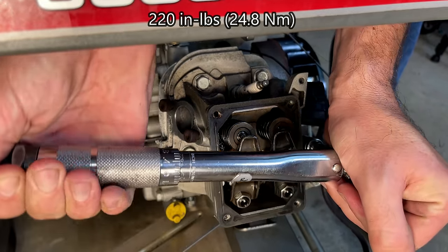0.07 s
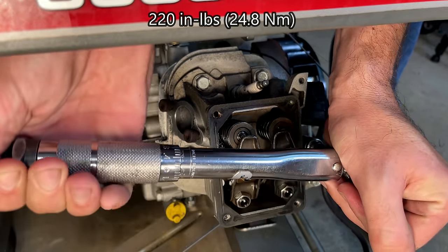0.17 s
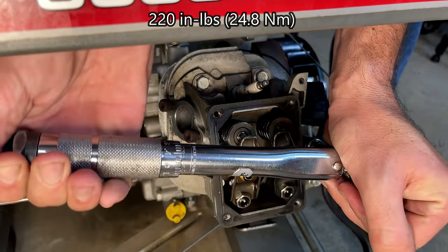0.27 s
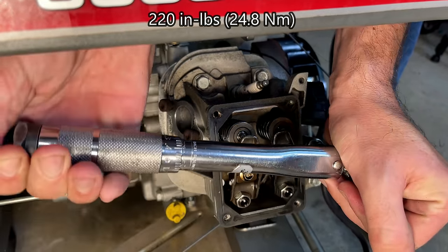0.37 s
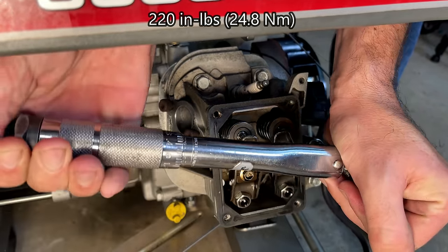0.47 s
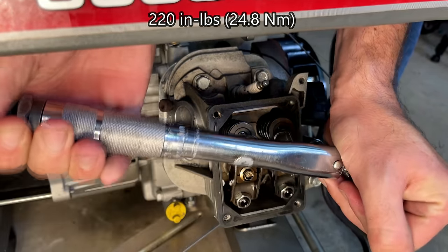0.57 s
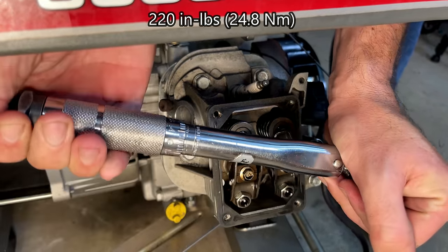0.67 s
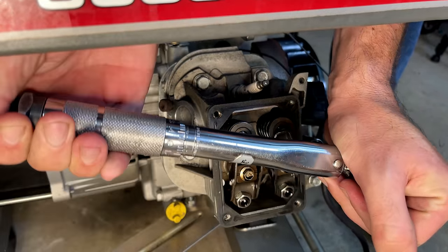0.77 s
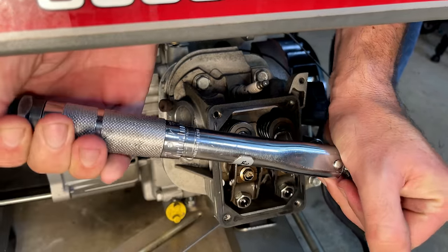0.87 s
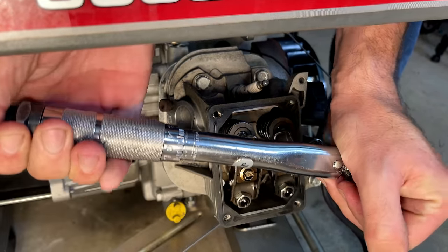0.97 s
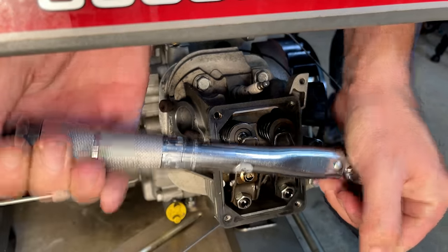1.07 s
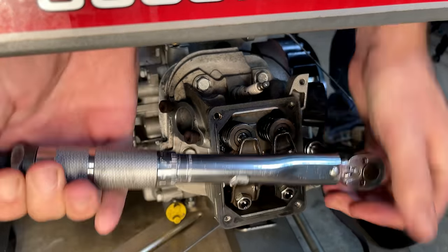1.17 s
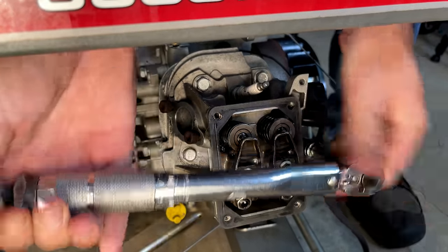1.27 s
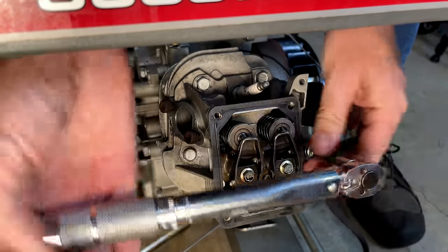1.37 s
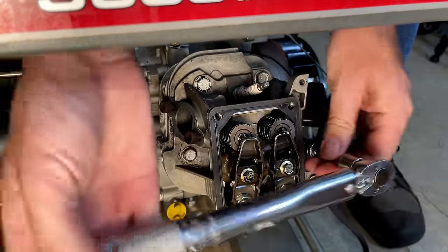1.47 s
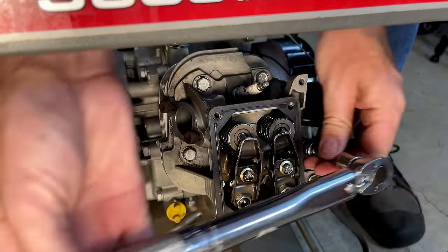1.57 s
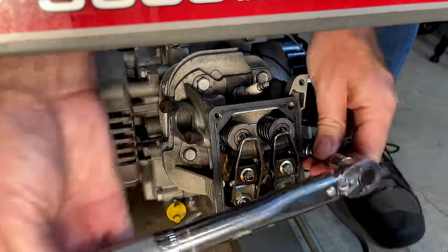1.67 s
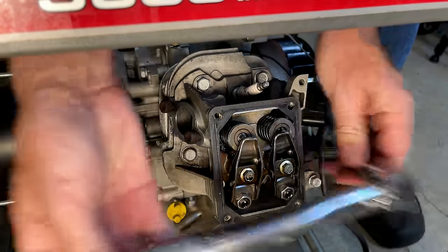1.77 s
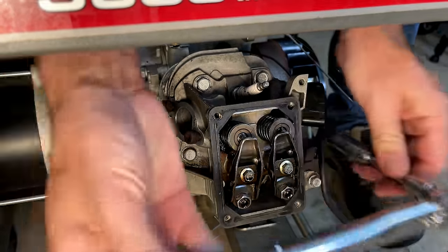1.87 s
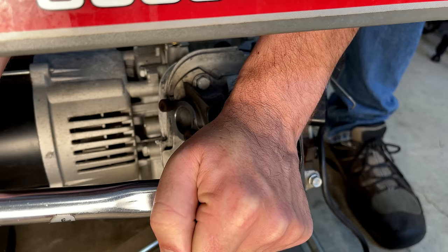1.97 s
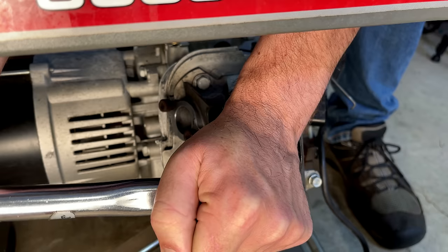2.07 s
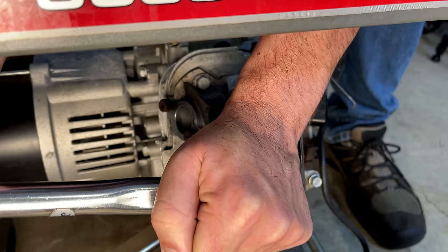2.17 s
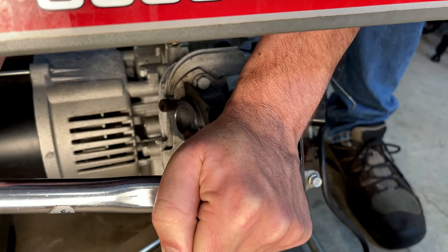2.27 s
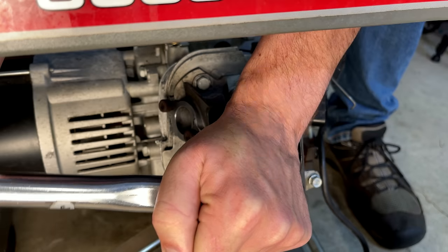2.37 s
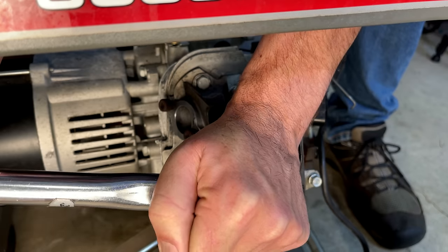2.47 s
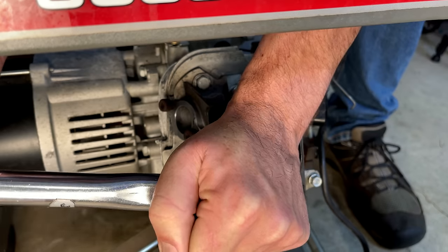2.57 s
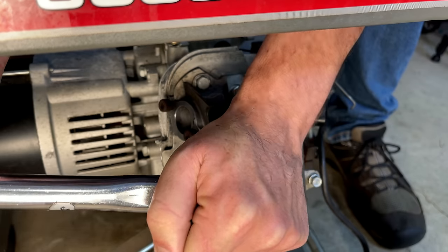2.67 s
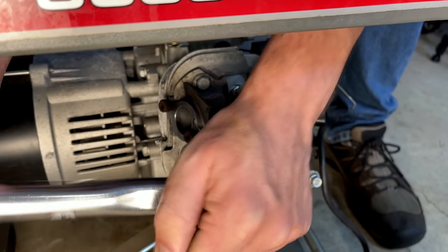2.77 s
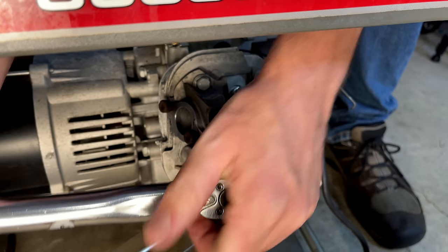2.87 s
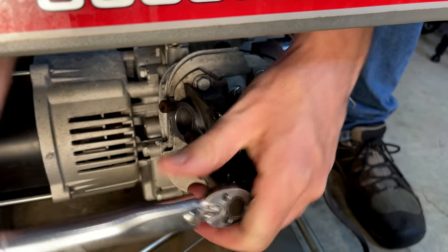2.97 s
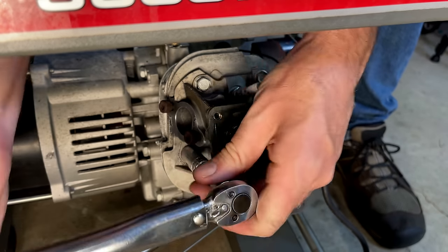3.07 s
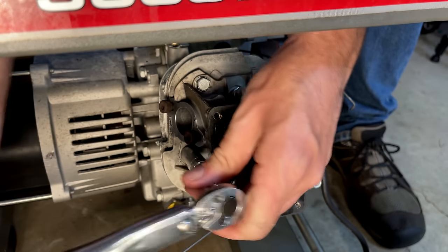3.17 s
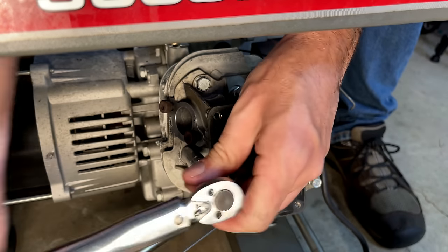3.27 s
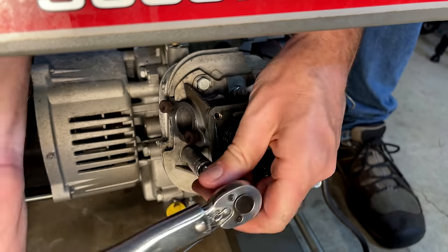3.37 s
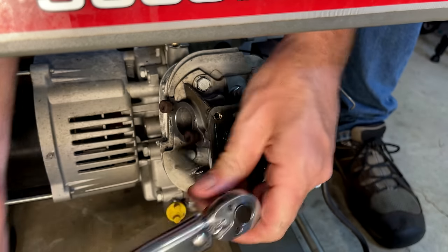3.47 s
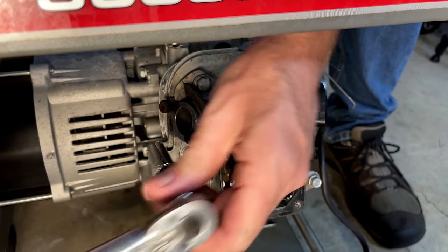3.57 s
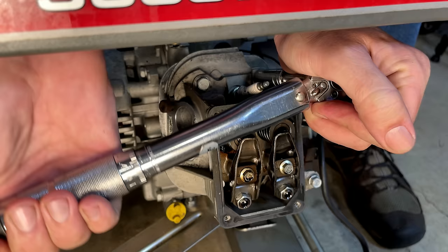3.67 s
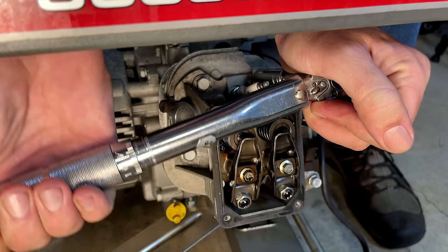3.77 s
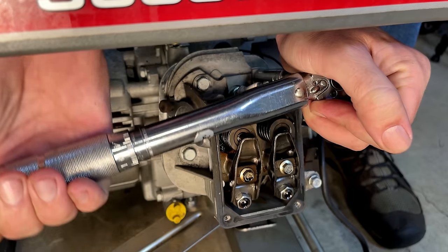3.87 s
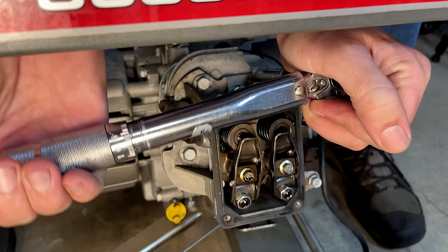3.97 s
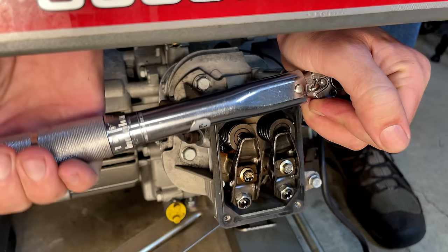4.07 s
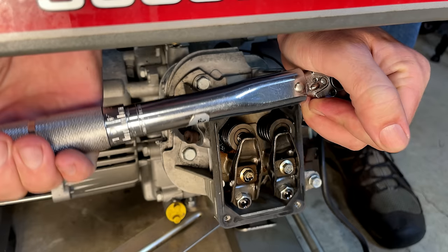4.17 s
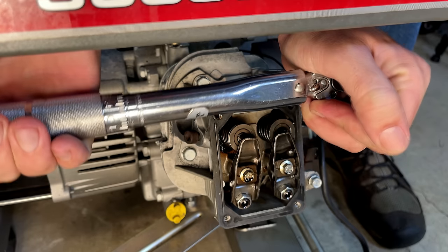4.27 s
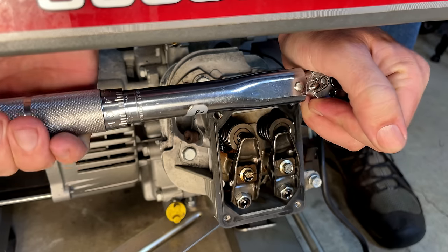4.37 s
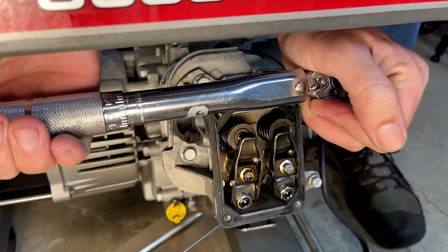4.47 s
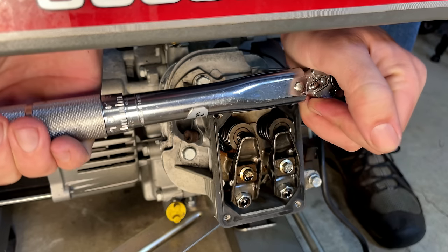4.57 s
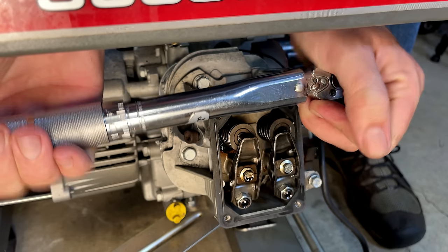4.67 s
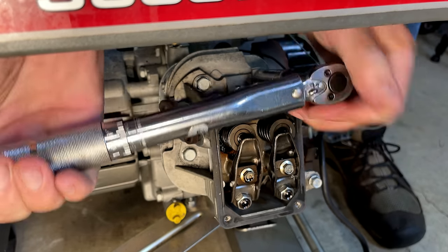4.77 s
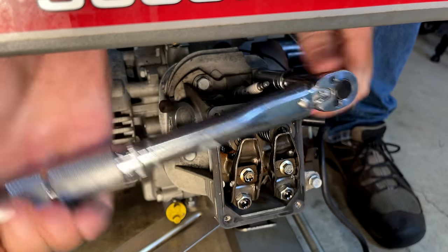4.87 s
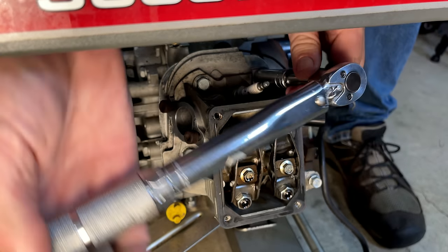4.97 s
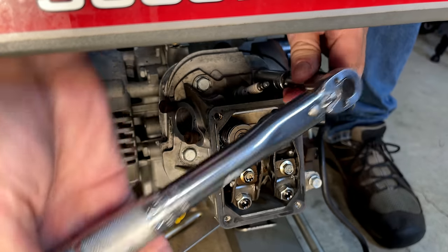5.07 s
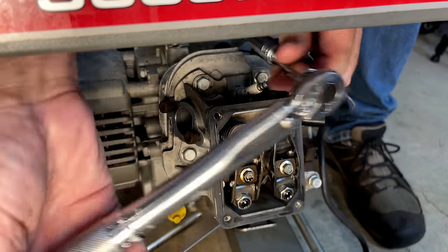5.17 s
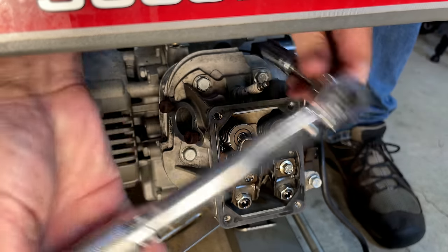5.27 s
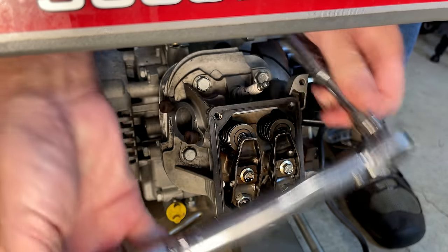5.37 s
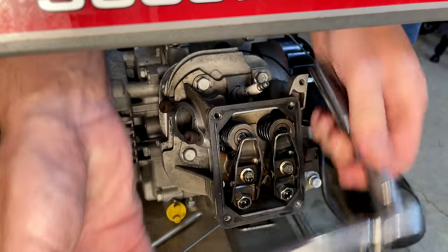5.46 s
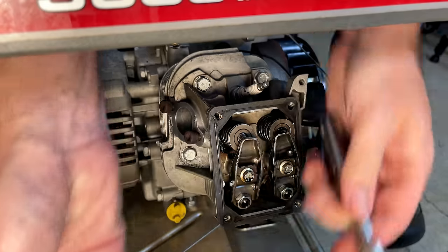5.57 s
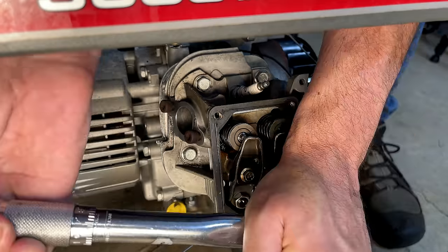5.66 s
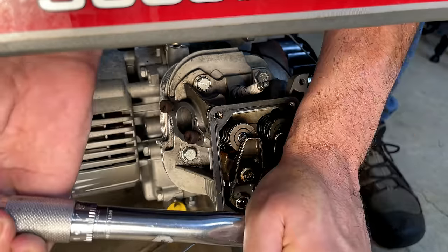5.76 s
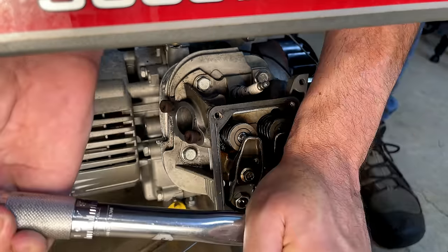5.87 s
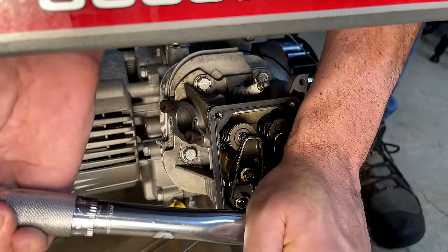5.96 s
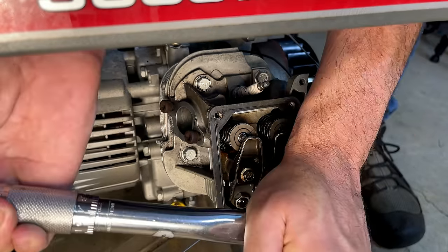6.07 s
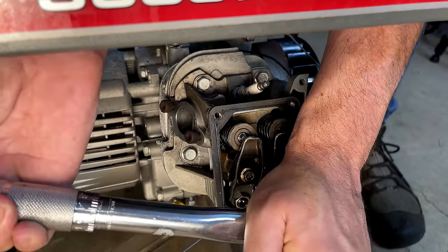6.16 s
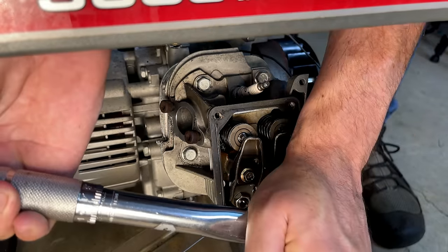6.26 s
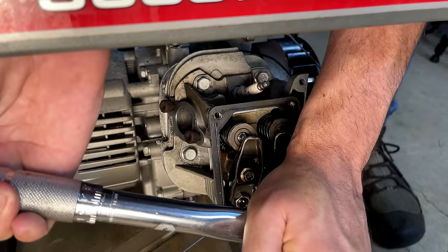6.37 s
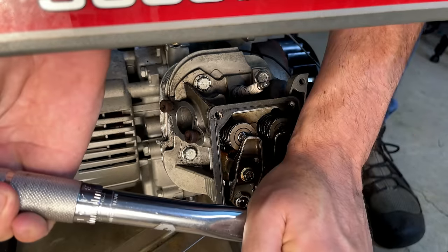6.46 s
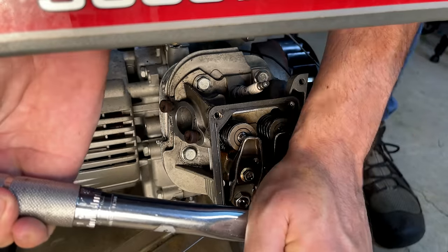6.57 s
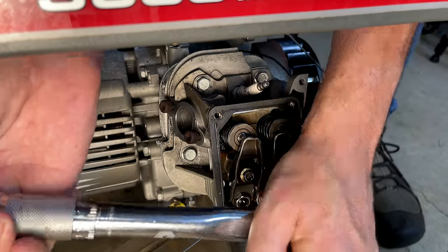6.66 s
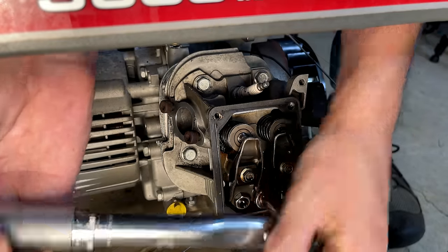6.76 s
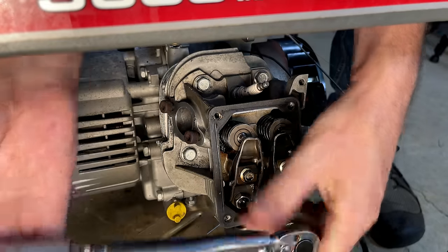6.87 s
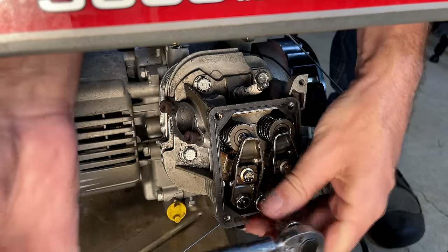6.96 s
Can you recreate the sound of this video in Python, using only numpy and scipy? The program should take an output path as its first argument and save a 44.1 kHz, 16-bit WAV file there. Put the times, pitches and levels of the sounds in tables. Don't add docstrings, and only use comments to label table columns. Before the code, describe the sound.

Four pairs of hard, ringing steel clicks from a torque wrench on an engine, with faint ratchet ticks and socket knocks over low workshop hum.

```python
import sys
import numpy as np
from scipy import signal
from scipy.fft import rfft, irfft
from scipy.io import wavfile
from scipy.ndimage import uniform_filter1d

SR = 44100
rng = np.random.default_rng(int(sys.argv[2]) if len(sys.argv) > 2 else 0)


def voltage_ratio(level):
    return 10 ** (np.asarray(level, float) / 20)


def master_out(mix):
    frames = np.transpose(np.atleast_2d(mix))
    ceiling = np.clip(frames, -1, 1)
    pcm = np.round(ceiling * 32767).astype(np.int16)
    wavfile.write(sys.argv[1], SR, pcm)


N = 310023
BLOW_SIZE, LEAD = 4096, 200
BLOW_HZ = np.fft.rfftfreq(BLOW_SIZE, 1 / SR)

# [t/s, peak level/dB, rattle length/ms, room share/dB, thud level/dB]
CLICKS = [
    (0.6538, -22.5, 4.8, -2, -11.5),
    (1.163, -24.5, 5.9, -0.8, -10),
    (2.449, -25.5, 5.9, -0.52, -13.5),
    (2.8629, -26, 6.1, 1.38, -12.5),
    (4.3472, -23, 4.8, -1.6, -13.5),
    (4.774, -24.5, 5.4, -1, -12.5),
    (6.2938, -26.5, 5.5, 0.02, -13.5),
    (6.6942, -24.5, 5.4, -0.23, -17),
]


def shape(points, hz):
    f, db = np.transpose(points)
    return voltage_ratio(np.interp(np.log(hz + 1), np.log(f), db))


def walk(rate):
    hold = int(SR / rate)
    steps = np.repeat(rng.standard_normal(N // hold + 1), hold)
    return 1.2 * uniform_filter1d(uniform_filter1d(steps, hold), hold)[:N]


def background():
    # [f/Hz, level/dB per Hz]
    air_colour = [(50, -45.5), (85, -10), (113, -2.5), (141, -9.5), (200, -3), (228, -15.5), (284, -10),
                  (317, -14), (361, -15), (450, -16), (761, -18.5), (1320, -23.5), (2000, -33.5),
                  (2770, -35), (16000, -46.5)]
    # [f/Hz, level/dB, wander/Hz]
    hum = [(58.6, -65, .1), (117, -71, 5), (192, -83, 8), (361.5, -76, 6.9), (6550, -94.5, 64),
           (2790, -93, 25), (5250, -99, 28)]
    hz = np.fft.rfftfreq(N, 1 / SR)
    noise = rfft(rng.standard_normal(N)) * shape(air_colour, hz)
    air = 0
    for octave in np.arange(5, 15):
        band = irfft(noise * np.clip(1 - abs(np.log2(hz + 1) - octave), 0, 1), N)
        air = air + band * voltage_ratio(0.23 * walk(0.713) + 0.23 * walk(11))
    lines = 0
    for f, db, wander in hum:
        level = voltage_ratio(db + wander ** 0.1 * walk(34))
        phase = 2 * np.pi * np.cumsum(f + wander * walk(25)) / SR
        lines = lines + level * np.sin(phase)
    return voltage_ratio(-63.5) * air / air.std() + np.sqrt(2) * lines


def resonance(hz, centre_hz, width_hz):
    return 1j * hz * width_hz / (centre_hz ** 2 - hz ** 2 + 1j * hz * width_hz)


def causal(gain):
    cepstrum = irfft(np.log(gain + 1e-6))
    half = len(cepstrum) // 2
    cepstrum[1:half] *= 2
    cepstrum[half + 1:] = 0
    return np.exp(rfft(cepstrum))


def blow(peak_db, rattle_ms, rise_ms, wet_db, colour, slip_db):
    ms = (np.arange(BLOW_SIZE) - LEAD) / SR * 1000
    chance = rng.standard_normal((2, BLOW_SIZE))
    swell = np.clip(ms / rise_ms, 0, 1) * np.exp(-(np.maximum(ms, 0) / rattle_ms) ** 0.93)
    slip = voltage_ratio(slip_db) * (ms > -3.5) * (ms < 0)
    contact = rfft(chance[0] * voltage_ratio(3.5 * chance[1]) * swell)
    beam = 1j * BLOW_HZ / (1200 + 1j * BLOW_HZ)
    beam = beam * voltage_ratio(-22 * np.clip((BLOW_HZ - 15300) / 1200, 0, 2))
    evenness = np.sqrt(uniform_filter1d(abs(contact) ** 2, size=60))
    near = irfft(contact * beam * colour / evenness) * (ms >= 0)
    near += irfft(rfft(chance[1] * slip) * beam * colour) / np.sqrt(SR / 1000)
    far = voltage_ratio(wet_db) * np.roll(irfft(colour), shift=LEAD)
    peak = np.sqrt(uniform_filter1d(near ** 2, size=88).max())
    return voltage_ratio(peak_db) * np.array([near, far]) / peak


def add(out, s, y):
    i = int(s * SR) - LEAD
    out[:, i:i + y.shape[1]] += y[:, :N - i]


def strikes(rows, crack, rings, ring_db, rise_ms, slip_db):
    # [f/Hz, level/dB per Hz]
    thud = [(70, -27), (115, -3), (200, -6), (330, -7.5), (460, -5), (700, 2.49), (1000, -2), (1500, -6.5),
            (2500, -27.5)]
    out = np.zeros((2, N))
    for (s, peak_db, rattle_ms, wet_db, thud_db), modes in zip(rows, rings):
        tube = 0
        for f, width, db in modes:
            tube = tube + voltage_ratio(2 * db) * abs(resonance(BLOW_HZ, f, width * (1 + f / 9000))) ** 2
        power = shape(crack, BLOW_HZ) ** 2
        power = power + voltage_ratio(2 * ring_db) * tube / (1 + (BLOW_HZ / 14600) ** 14)
        power = power + (voltage_ratio(thud_db) * shape(thud, BLOW_HZ)) ** 2
        add(out, s, blow(peak_db, rattle_ms, rise_ms, wet_db, causal(np.sqrt(power)), slip_db))
    return out


def wrench_clicks():
    # [f/Hz, level/dB per Hz]
    cracks = [
        [(820, -47), (1400, -11.5), (2400, -12), (3300, -11), (4700, -9.5), (6000, -9), (11600, -13.5),
         (15600, -30)],
        [(820, -49), (1400, -24), (2300, -14), (3400, -9), (4600, -10), (7200, -11.5), (12500, -19.5),
         (15600, -39.5)],
    ]
    # [f/Hz, width/Hz, level/dB]
    break_rings = [
        [(2070, 220, -11), (3464, 600, -4), (6400, 180, 3.5), (6900, 550, -6), (8080, 120, -0.5),
         (8711, 1000, -5.5), (13600, 1800, -11.5)],
        [(3100, 80, -3.5), (3140, 400, -5), (3855, 66, 0.5), (4340, 150, -2.5), (5218, 86, -3.5),
         (9150, 150, -5), (10000, 1100, -6), (7900, 950, -8)],
        [(2320, 580, -13), (3300, 420, -1.5), (4318, 100, -1.5), (5120, 150, 0), (6600, 400, -1),
         (8270, 200, 0.5), (9550, 250, 0), (12000, 700, -6), (14300, 1200, -13)],
        [(1934, 126, -4), (3096, 98, 0.5), (3250, 310, -2.5), (4330, 326, -6), (6170, 150, -1.5),
         (7660, 900, -5), (9730, 325, 0), (13200, 1200, -9)],
    ]
    # [f/Hz, width/Hz, level/dB]
    reset_rings = [
        [(1950, 400, -6.5), (3010, 370, -4), (3800, 220, -2), (4350, 300, -1), (6040, 1500, -6.5),
         (8660, 250, -1), (9830, 200, -1), (12100, 900, -9.5)],
        [(1720, 120, -5.5), (2930, 280, -2.5), (3172, 80, 1.5), (3840, 270, 1.5), (8600, 170, -4),
         (7400, 1800, -11), (9740, 150, -3.5), (13040, 1400, -14.5)],
        [(1810, 286, -7.5), (2616, 300, -8.5), (3260, 300, -6.5), (3762, 57, 2), (4275, 80, 0.5),
         (5072, 160, -3.5), (6600, 150, -6.5), (8590, 210, -4), (9840, 270, -2.5), (12500, 1200, -11)],
        [(1722, 162, -6.5), (3057, 800, -5.5), (5300, 78, -12), (8650, 454, -6), (9610, 380, -9),
         (12800, 400, -10)],
    ]
    breaks = strikes(CLICKS[::2], cracks[0], break_rings, ring_db=0.91, rise_ms=0.93, slip_db=-41)
    resets = strikes(CLICKS[1::2], cracks[1], reset_rings, ring_db=0.93, rise_ms=0.78, slip_db=-54.5)
    return breaks + resets


def room(size=65536):
    # [f/Hz, t60/s]
    decay = [(120, 1.0), (400, 1), (900, 0.64), (1800, 0.66), (3200, 0.61), (5000, 0.6817), (7500, 0.53),
             (10500, 0.525), (15000, 0.29)]
    t, hz = np.arange(size) / SR, np.fft.rfftfreq(size, 1 / SR)
    grains = rng.standard_normal((2, size))
    noise = rfft(grains[0] * voltage_ratio(4 * grains[1] * np.exp(-t / 0.04)))
    f, t60 = np.transpose(decay)
    tail = 0
    for octave in np.arange(6, 14.5, 0.5):
        band = irfft(noise * np.clip(1 - 2 * abs(np.log2(hz + 1) - octave), 0, 1))
        tail = tail + band * voltage_ratio(-60 * t / np.interp(octave, np.log2(f), t60))
    build = 1 - np.exp(-(t / 0.022) ** 2)
    early = voltage_ratio(7) * np.clip(t / 0.014, 0, 1) * np.exp(-t / 0.0097)
    return voltage_ratio(-30) * tail * (build + early)


def echoes(far):
    joins = [2.039, 3.739, 5.557]
    echo, out = room(), np.zeros(N)
    edges = [0] + [int(s * SR) for s in joins] + [N]
    for a, b in zip(edges, edges[1:]):
        out[a:b] = signal.fftconvolve(far[a:b], echo)[:b - a]
    return out


def singing():
    # [f/Hz, t60/s, level after break/dB, level after reset/dB]
    modes = [
        [(461, .55, -61, -55), (3130, 0.6, -62.5, -60), (3752, .6, -57.5, -50), (4250, .6, -56.5, -60),
         (6270, .5, -53, -68)],
        [(454, 0.58, -56, -54), (715, .5, -54, -58), (3090, 0.77, -53.5, -49), (3752, 0.88, -53, -53),
         (4100, 0.72, -58, -51), (4266, .5, -50, -57.5), (5280, 0.84, -47, -54)],
        [(471, 0.66, -64.5, -55.5), (720, 0.5, -67, -56.5), (3170, 0.6, -63.5, -48), (3784, 0.91, -53.5, -54.5),
         (4300, 0.69, -51.5, -47), (4377, .55, -59, -57), (4985, .5, -50, -52), (5250, 0.78, -48.5, -56.5)],
        [(468.8, 0.68, -64, -57), (910, 0.61, -78, -55.5), (3057, .65, -51, -62.5), (3680, .7, -49, -49.5),
         (4200, 1.28, -59, -65), (4350, .45, -54, -50.5), (5350, 1.0, -58, -60)],
    ]
    swell_cycles, flutter_db = 22, 6.5
    out, flutter = np.zeros(N), voltage_ratio(flutter_db * walk(40))
    starts = [int(row[0] * SR) for row in CLICKS] + [N]
    for k, (a, b) in enumerate(zip(starts, starts[1:])):
        t = np.arange(b - a) / SR
        for (f, t60, *db), turn in zip(modes[k // 2], rng.random(9)):
            beats = flutter[int(turn * N / 2):][:b - a] ** ((500 / f) ** 0.3)
            swell = 1 - np.exp(-(t * f / swell_cycles) ** 2)
            fade = voltage_ratio(db[k % 2] - 60 * t / t60)
            out[a:b] += fade * beats * swell * np.sin(2 * np.pi * (f * t + turn))
    return out


def jerks():
    # [t/s, level/dB, f/Hz, length/ms]
    bumps = [
        (0.656, -51, 129.7, 7.7),
        (1.169, -58.5, 125, 46),
        (2.453, -53.5, 130, 15),
        (2.87, -58.5, 120, 15),
        (4.35, -49, 110, 10),
        (6.297, -45, 140, 5.1),
        (6.70, -65, 120, 9.9),
        (0.784, -54, 123, 28),
        (0.918, -56.5, 108, 34),
        (2.999, -59, 121, 33),
    ]
    t, out = np.arange(N) / SR, np.zeros(N)
    for s, db, hz, ms in bumps:
        bump = np.exp(-((t - s) * 1000 / ms) ** 2)
        out += voltage_ratio(db) * bump * np.sin(2 * np.pi * hz * (t - s))
    return out


def ticks():
    # [t/s, peak level/dB, ring f/Hz, ring width/Hz, room share/dB]
    touches = [(1.533, -58, 9300, 4000, 0.5), (1.832, -72, 8500, 6000, 2.5), (1.958, -59, 2040, 299, -6),
               (1.999, -60.5, 2190, 250, -7), (3.368, -65.5, 6740, 2500, 0), (3.435, -62, 4050, 1200, 2.5),
               (3.510, -71, 9500, 2500, -7), (3.566, -63.5, 5530, 2500, 7.5), (3.579, -57.5, 4620, 2000, 0),
               (3.632, -54.5, 3800, 400, -1.5), (3.718, -63, 2120, 300, -4.5),
               (5.214, -67.5, 7200, 2500, -5), (5.228, -69, 2270, 800, 1), (5.278, -66.5, 7400, 1800, -0.5),
               (5.350, -75, 5000, 2020, 0.5), (5.617, -75, 3100, 900, 3), (5.655, -74, 6700, 900, -6),
               (5.667, -67, 6600, 1300, -6), (5.694, -71, 5500, 2000, -3), (5.701, -67.5, 6500, 4000, -9),
               (5.713, -70.5, 8800, 1500, -10), (5.738, -75, 4600, 5000, -10),
               (5.76, -70.5, 7000, 2500, -15.5)]
    # [f/Hz, level/dB per Hz]
    thin_crack = [(1000, -22), (2500, 15.5), (6000, 4), (12000, -2), (16000, -39.5)]
    out = np.zeros((2, N))
    for s, peak_db, ring_hz, width_hz, wet_db in touches:
        crack_db = -25 + 9 * np.log2(width_hz / 1000)
        ring = abs(resonance(BLOW_HZ, ring_hz, width_hz)) ** 3
        colour = causal(voltage_ratio(crack_db) * shape(thin_crack, BLOW_HZ) + ring)
        add(out, s, blow(peak_db + 0.5, 4.2, 0.26, wet_db, colour, slip_db=-60))
    return out


def socket_knocks():
    # [t/s, peak level/dB, rattle length/ms, room share/dB, thud level/dB]
    knocks = [
        (1.8908, -53.5, 5.5, 1.62, -9),
        (3.4067, -52, 6.5, 2.4, -1.5),
        (3.5979, -46.5, 4.6, 1.1, -13),
    ]
    # [f/Hz, width/Hz, level/dB]
    rings = [
        [(1700, 440, -14), (2040, 100, -2.5), (2380, 250, -7.5), (3100, 67, -6), (5070, 36, -19),
         (8300, 720, -17), (11800, 500, -19), (12800, 39, -14.5)],
        [(1500, 226, 2.5), (2090, 150, -10), (2630, 100, -0.5), (3104, 25, 5), (5340, 224, -5.5),
         (8000, 700, -20.5), (9460, 160, -10), (11130, 300, -11), (12400, 65, -19)],
        [(2130, 100, 1), (2704, 190, 0), (3800, 137, 1.5), (5570, 226, -2), (6500, 92, -16), (7660, 60, -1.5),
         (8600, 1200, -22), (10800, 1160, -18), (14900, 200, -22)],
    ]
    # [f/Hz, level/dB per Hz]
    crack = [(710, -34), (1200, -5), (2400, -8), (3400, -13), (5400, -13.5), (6900, -23), (12500, -33),
             (16000, -48)]
    return strikes(knocks, crack, rings, ring_db=2.0, rise_ms=0.45, slip_db=-45)


def scene():
    near, far = wrench_clicks() + ticks() + socket_knocks()
    out = background() + echoes(far) + singing() + jerks()
    soft_top = np.clip((15900 - np.fft.rfftfreq(N, 1 / SR)) / 250, 0, 1) ** 2
    out = near + irfft(rfft(out) * soft_top, N)
    return np.array([out, out])


def top_cut(x):
    return signal.sosfilt(signal.butter(12, 16830, fs=SR, output="sos"), x)


def record(dry):
    return top_cut(dry)


dry = scene()
out = record(dry)
master_out(out)
```